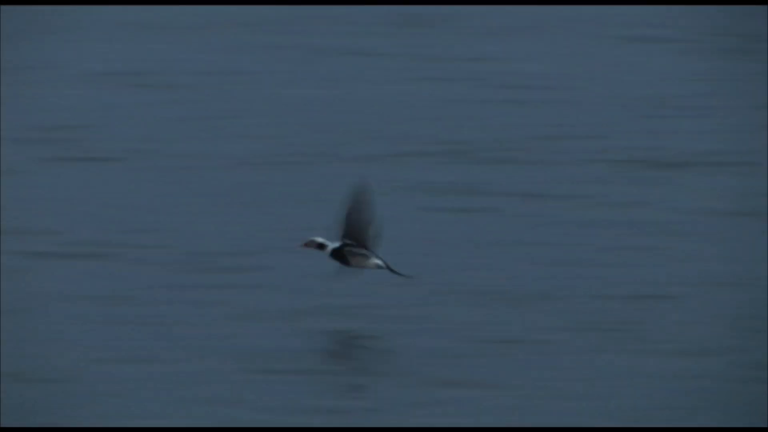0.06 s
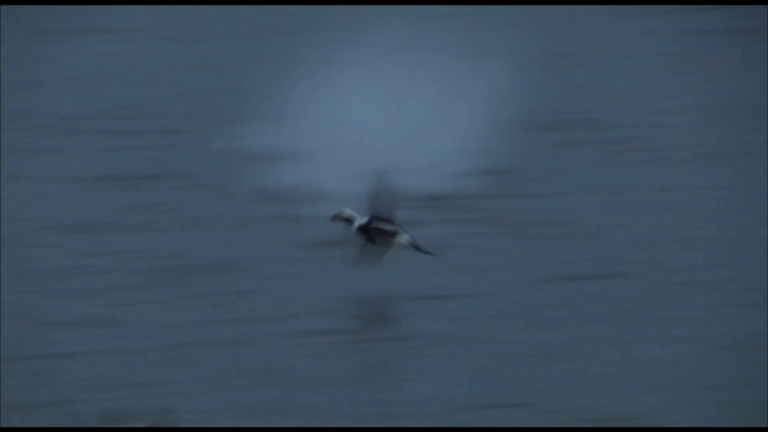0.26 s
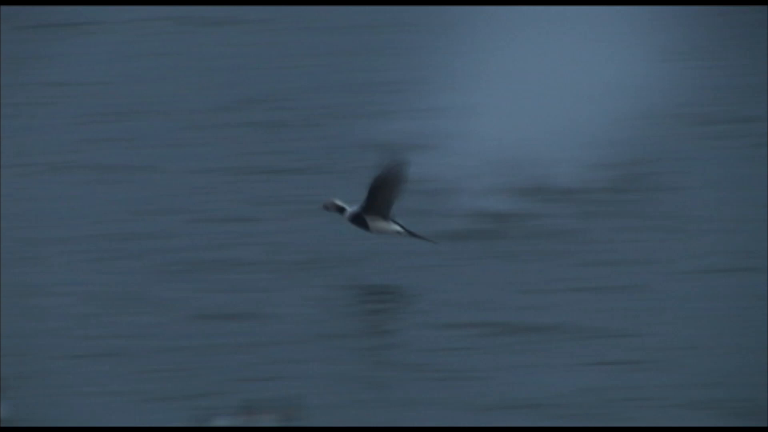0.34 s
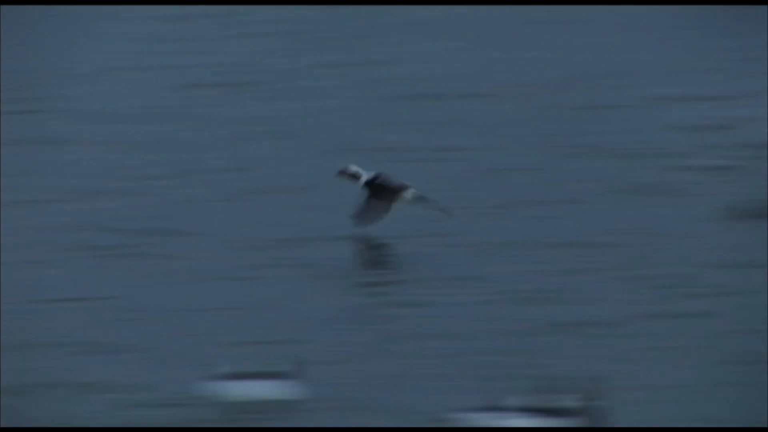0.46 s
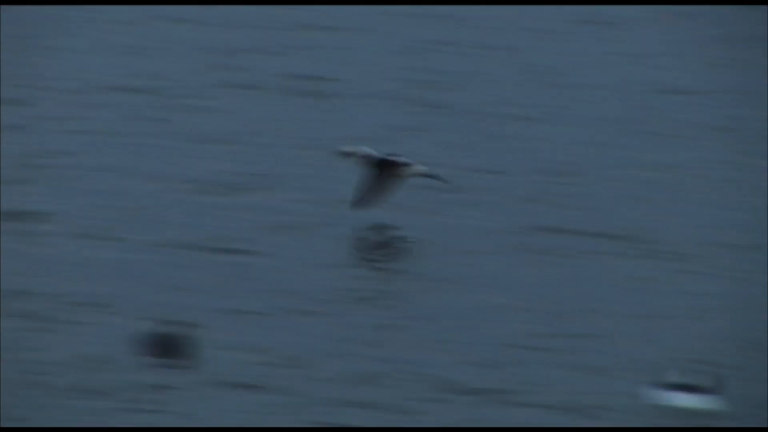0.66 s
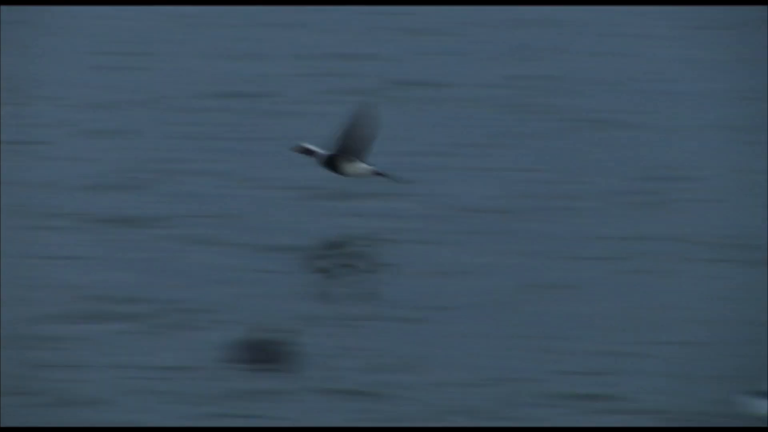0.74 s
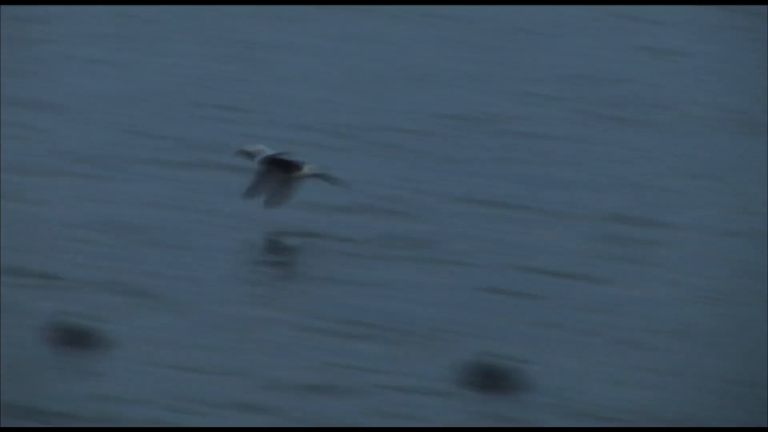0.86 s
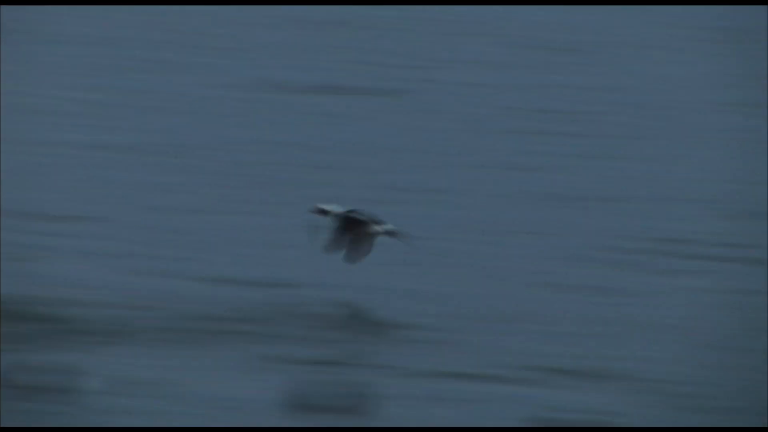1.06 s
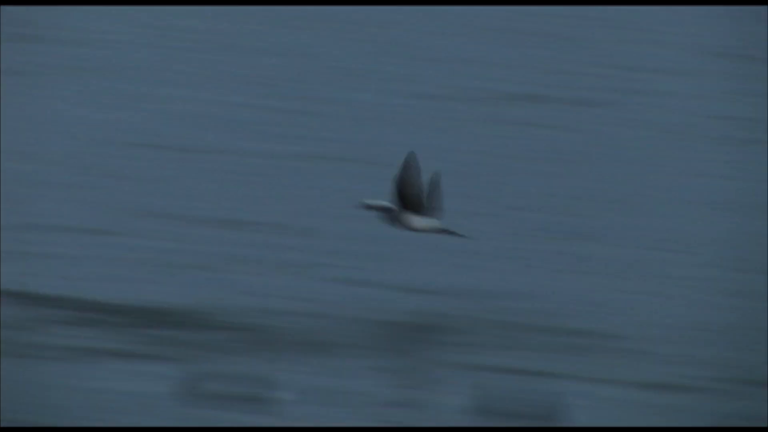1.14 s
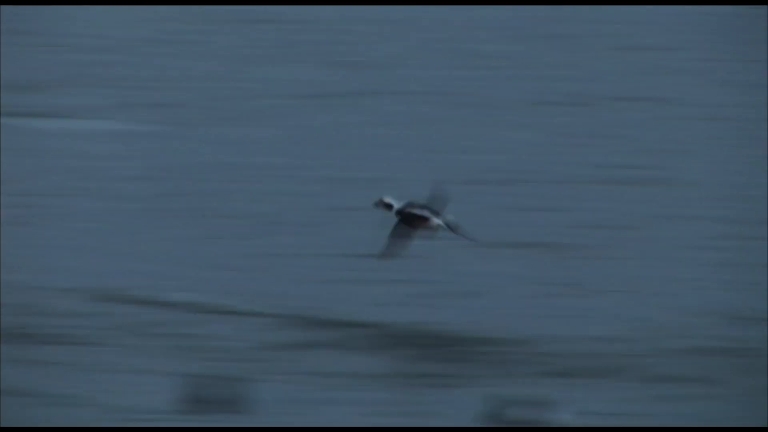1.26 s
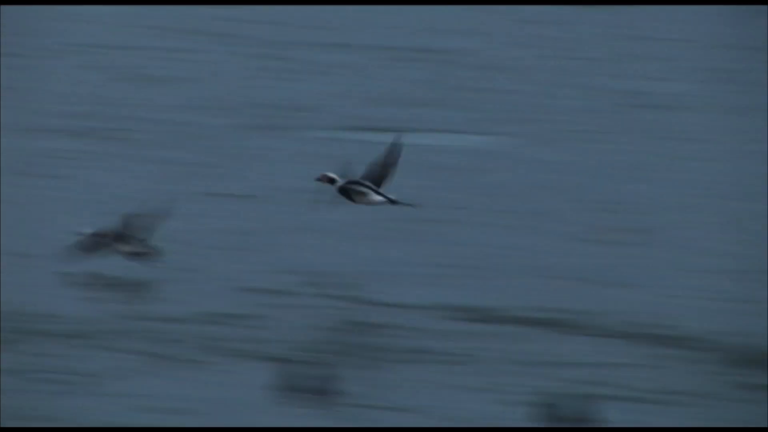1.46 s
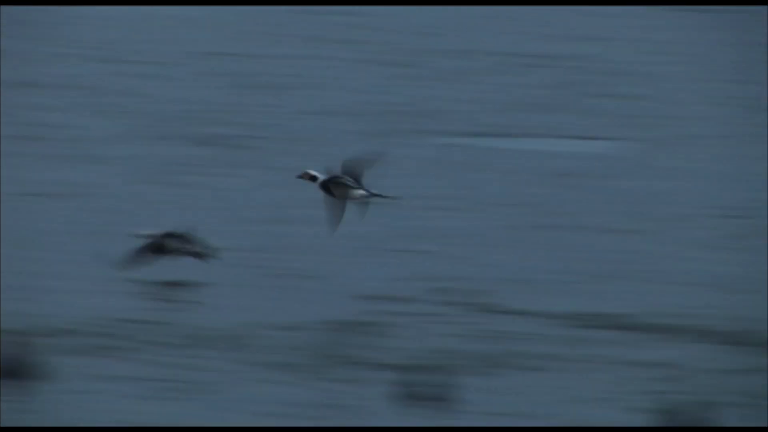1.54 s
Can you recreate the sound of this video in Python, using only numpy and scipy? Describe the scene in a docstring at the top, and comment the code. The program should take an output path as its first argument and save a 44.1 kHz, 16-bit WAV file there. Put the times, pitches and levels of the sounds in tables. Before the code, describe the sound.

A loud, close shotgun blast cracks at 0.2 seconds, overloading the microphone and scattering over open water. Pellets slap the surface at 0.4 seconds. From about 0.7 seconds a rolling echo returns from the far shore and fades. Hollow knocks and metal gun clicks sound nearby between 1 and 1.4 seconds, with a very faint swish and rising whistle. Light wind and quiet lapping water continue throughout.

```python
"""One shotgun shot over open water. After a faint click of the gun, the blast overloads the microphone
and scatters back off the waves. A fifth of a second after the blast, the pellets slap the water.
Then the far shore sends back a rolling echo. As it fades, hollow knocks and metal clicks sound nearby,
followed by a soft swish and a faint, rising whistle. Light wind and lapping water go on throughout."""
import sys
import numpy as np
from scipy import signal
from scipy.fft import rfft, irfft, next_fast_len
from scipy.io import wavfile

SR = 44100
rng = np.random.default_rng(int(sys.argv[2]) if len(sys.argv) > 2 else 0)


def file_out(sig):
    """Save sig as 16-bit WAV at sys.argv[1]."""
    # one column per channel
    cols = np.atleast_2d(sig).T
    # limit, then scale
    lim = np.clip(cols, -1, 1)
    pcm = np.round(lim * 32767).astype(np.int16)
    wavfile.write(sys.argv[1], SR, pcm)


N = 70560
SHOT_S = 0.20265

# Tone of a fine, high hiss: pitch_hz, level_db
FIZZ_TONE = [(1000, -42), (4000, -17.5), (7000, -13.5), (11000, 2), (16000, 1.5)]
# How alike left and right are for near, far and background sounds: pitch_hz, likeness (1 = the same)
NEAR_STEREO = [(100, 0.63), (700, 0.34), (1500, .82), (3100, 1), (5000, 0.4), (7000, .45), (10000, 0.17),
               (15000, 0.33)]
FAR_STEREO = [(100, 1), (600, 0.81), (3000, 0.98), (7000, 0.15), (15000, .15)]
BACKGROUND_STEREO = [(50, 0.24), (1500, 0.83), (9000, .2)]


def muzzle_blast():
    """A thin spit, then a hard crack, a low boom and a fizz; things close by ring and throw it back."""
    # Tones of the crack, the boom and the close echoes: pitch_hz, level_db
    crack_tone = [(30, -19), (150, -11), (230, -20), (345, -5), (500, -8.5), (715, -11), (950, -15),
                  (1250, -8), (1550, -5), (1950, -2), (2300, -9.5), (3000, -4.5), (4300, -15.5),
                  (5000, -11), (6500, -21.5), (11000, -13.5), (16000, -16.5)]
    boom_tone = [(30, -8), (80, -12.5), (140, -3.5), (220, -3), (345, -1.5), (600, -7.5), (1200, -10.5),
                 (3000, -7), (6000, -25), (16000, -49.5)]
    rebound_tone = [(30, -23), (150, -1.5), (360, -4.5), (520, 0.5), (720, -4.5), (1000, -15.5),
                    (8000, -59)]
    # Echoes off things close by: start_s, level_db
    rebound_hits = [(.2288, -10), (.2525, -18.5)]
    # Notes the blast sets ringing near the microphone: pitch_hz, level_db, fade_s
    notes = [(345.8, -3.5, 0.2), (734, -0.5, 0.11), (1215, -13.5, 0.15), (1515, 2, 0.11), (1709, 2, 0.094),
             (2265, -1.5, .12), (2570, -13.5, 0.079), (2937, 1.5, .09), (3840, -9, 0.1)]
    spit = amp(-26) * envelope(SHOT_S - 0.0025, 0.0021, 0.00081, 0.0076) * noise(FIZZ_TONE, NEAR_STEREO)
    crack = amp(-5) * envelope(SHOT_S, 0.0014, 0.0073, 0.071) * noise(crack_tone, NEAR_STEREO, grain_db=1)
    boom = amp(-18) * envelope(SHOT_S, 0.011, 0.023, 0.27) * noise(boom_tone, FAR_STEREO, grain_db=6)
    fizz = amp(-21) * envelope(SHOT_S, 0.001, 0.0052, 0.28) * noise(FIZZ_TONE, NEAR_STEREO, grain_db=10.5)
    ring_middle = ring(notes, SHOT_S, rise_s=0.0037)
    ring_sides = amp(-8) * np.array([[1], [-1]]) * ring(notes[1:], SHOT_S, rise_s=0.0016)
    rebounds = strikes(rebound_hits, rebound_tone, tail_gain=0.03, tail_s=0.0311)
    return spit + crack + boom + fizz + amp(-15) * (ring_middle + ring_sides) + rebounds


def wave_scatter():
    """Countless waves throw the blast back: close ones hiss, distant ones answer later and duller."""
    # Tones of the echo off close and distant waves: pitch_hz, level_db
    near_tone = [(30, -21), (170, -2.5), (300, -10), (700, -5), (1300, -4), (2300, -5.5), (3500, -13),
                 (5000, -27), (7000, -45), (10000, -37), (16000, -39.5)]
    far_tone = [(100, -24), (250, -7), (400, 0.5), (600, -10.5), (1000, -3), (2000, -14.5), (5000, -43)]
    near = amp(-25.5) * envelope(SHOT_S, 0.0067, 0.15, 0.86) * noise(near_tone, FAR_STEREO, grain_db=6.5)
    far = amp(-42.5) * envelope(0.359, 0.11, 0.16, 0.6) * noise(far_tone, FAR_STEREO)
    hiss = amp(-47) * envelope(SHOT_S, 0.02, 0.15, 0.3) * noise(FIZZ_TONE, NEAR_STEREO, grain_db=2)
    return near + far + hiss


def pellets():
    """The cloud of pellets hits the water: a few hard slaps in a dense patter, with fine spray."""
    # Tones of the patter and the hard slaps: pitch_hz, level_db
    patter_tone = [(30, -43), (300, -19.5), (560, -4), (850, -13.5), (1300, -5), (2300, 1.5), (3600, -7.5),
                   (4400, -20.5), (5000, -15), (6000, -28.5), (12500, -30.5), (16000, -39)]
    slap_tone = [(30, -48), (600, -34), (1400, -15.5), (2300, -2), (2750, -2.5), (3200, -6), (3850, -2.5),
                 (4600, -40), (6000, -31), (9000, -50.5), (12500, -33), (16000, -57)]
    # The loudest pellets landing: start_s, level_db
    hits = [(.3912, -11), (.3981, -0.5), (.4003, 1.5), (.4078, 2), (.4202, 0.5), (.4275, -9), (.4333, -28),
            (.4398, -16)]
    peak_s, rise_s, fall_s = 0.4209, 0.012, 0.02
    t = clock() - peak_s
    width_s = np.where(t < 0, rise_s, fall_s)
    cloud = 1 / np.cosh(np.clip(t / width_s, -20, 20))  # a smooth hump in loudness
    patter_stereo = [(3500, 1.0), (8000, 0.86), (12000, 1.0)]  # pitch_hz, likeness
    patter = amp(-13.5) * cloud * noise(patter_tone, patter_stereo, grain_db=5)
    spray = amp(-47) * cloud * noise(FIZZ_TONE, NEAR_STEREO, grain_db=9)
    slaps = strikes(hits, slap_tone, tail_gain=0.025, tail_s=0.0142, bass_delay_s=0.00048)
    return patter + spray + slaps


def shore_echo():
    """The far shore answers with a faint first echo, a broad clap, a lumpy low roll and a crackle."""
    # Tones of the whole shore's echo, its roll and its single faces: pitch_hz, level_db
    shore_tone = [(30, -19), (60, -7), (140, 5), (330, 1.5), (550, -2), (1200, -4.5), (2300, -2.5),
                  (3400, -10.5), (4300, -22.5), (5500, -30.5), (7000, -82), (16000, -48)]
    roll_tone = [(30, -39), (110, 3.5), (175, -5.5), (240, -2), (400, 1), (740, -8.5), (1100, -11),
                 (2300, -12.5), (3500, -28), (5000, -36), (7000, -79.5)]
    face_tone = [(30, -19), (300, -9), (950, 10), (1500, -8), (2100, 3.5), (2900, -5), (4000, -12.5),
                 (6000, -45), (16000, -37.5)]
    # Sharp echoes off single faces of the shore: start_s, level_db
    face_hits = [(.673, -44), (.7295, -13.5), (.759, -18.5), (.847, -20), (.918, -26)]
    first = amp(-34.5) * envelope(0.671, 0.0016, 0.042, 0.54) * noise(shore_tone, FAR_STEREO, grain_db=6.5)
    clap = amp(-23) * envelope(0.709, 0.016, 0.034, 0.25) * noise(shore_tone, FAR_STEREO)
    roll = amp(-33.5) * envelope(0.745, 0.048, 0.077, 0.73) * noise(roll_tone, FAR_STEREO, grain_db=4.5)
    roll *= lumps(depth_db=2, rate_hz=180)
    roll *= envelope(0, 0.028, 0.93, 1.0)  # its end dies away faster
    roll *= amp([[-1.5], [1.5]])  # leans to the right
    crackle = amp(-36.5) * envelope(0.9, 0.016, 0.042, 0.097) * noise(face_tone, FAR_STEREO, grain_db=6.5)
    swells = echo_swells()
    faces = strikes(face_hits, face_tone, tail_gain=0.068, tail_s=0.044)
    return first + clap + roll + swells + crackle + faces


def echo_swells():
    """The rolling echo gathers briefly around one low pitch after another."""
    # Hollow swells in the roll: peak_s, pitch_hz, level_db
    swells = [(.785, 320, -32.5), (0.85, 410, -29.5), (0.911, 180, -32)]
    t, half_length_s = clock(), 0.026
    hum = np.zeros(N)
    for peak_s, hz, db in swells:
        hump = np.exp(-((t - peak_s) / half_length_s) ** 2)
        hum += amp(db) * hump * np.sin(2 * np.pi * (hz * t + rng.random()))
    return hum * lumps(depth_db=1.5, rate_hz=76)


def gun_clicks():
    """Each click rings the gun's metal and rasps briefly."""
    # The clicks: start_s, level_db, rasp_fade_s, ring_db (added to level_db)
    clicks = [(0.086, -43.5, 0.088, -2), (0.59, -41.5, 0.056, -10), (1.0913, -22, 0.012, -5.5),
              (1.1029, -32.5, 0.017, -7), (1.2175, -33, 0.023, -10)]
    # Notes of the metal: pitch_hz, level_db, fade_s
    metal_notes = [(1100, 1, 0.026), (1650, -5.5, 0.014), (3130, -2, 0.018), (3820, 0, 0.0079),
                   (5800, -23.5, 0.042), (9570, -18, 0.0065)]
    # Tone of the rasp: pitch_hz, level_db
    rasp_tone = [(500, -29), (1100, 3), (3400, 4.5), (4400, -3.5), (5600, 1), (7000, -31),
                 (10000, -3), (16000, -11)]
    rasp_noise = noise(rasp_tone, NEAR_STEREO)
    sound = np.zeros((2, N))
    for start_s, db, rasp_fade_s, ring_db in clicks:
        ringing = amp(ring_db) * ring(metal_notes, start_s, rise_s=0.0003)
        rasp = amp(-7) * envelope(start_s, 0.00026, 0, rasp_fade_s) * rasp_noise
        sound += amp(db) * (ringing + rasp)
    return sound


def knocks():
    """Dull knocks on something hollow: a short ring, a tap, and a longer rattle the looser the contact."""
    # The knocks: start_s, level_db, ring_db (more or less ring than usual), looseness (0 to 1)
    hits = [(0.9661, -13.5, -12.5, .06), (0.971, -27.5, -6.5, .07), (1.003, -30, 1.5, 0.13),
            (1.3513, -40.5, -3, .15), (1.3733, -31, -7, 0.13), (1.389, -41, -4, 0.21)]
    # Tone of the tap: pitch_hz, level_db
    tap_tone = [(50, -18), (500, 3.5), (950, 5.5), (2100, 0), (3000, -4.5), (4200, -22), (6000, -43.5),
                (16000, -58)]
    # Notes of the hollow thing: pitch_hz, level_db, fade_s
    hollow_notes = [(185, 2, 0.069), (371.3, 3, 0.039), (940, 1, 0.028), (970, 3, .07), (1530, -16, 0.032)]
    sound = np.zeros(N)
    for start_s, db, ring_db, looseness in hits:
        sound += amp(db + ring_db - 9.5) * ring(hollow_notes, start_s, rise_s=0.00077)
        sound += strikes([(start_s, db)], tap_tone, tail_gain=looseness, tail_s=0.41 * looseness)
    return sound


def whistle():
    """A faint, fuzzy whistle in the distance holds its pitch, then slides upward and blurs."""
    start_s, steady_s = 1.185, 0.06
    pitch_hz, blur_hz, climb_hz_per_s = 2200, 90, 7000
    climb_hz = climb_hz_per_s * np.clip(clock() - start_s - steady_s, 0, 0.2)
    waver, flutter = unit(filtered(rng.standard_normal((2, N)), lambda f: np.exp(-(f / 130) ** 2)))
    hz = pitch_hz + climb_hz + (blur_hz + climb_hz / 2) * waver
    note = (1 + 0.5 * flutter) * np.sin(2 * np.pi * np.cumsum(hz) / SR)
    return amp(-57.5) * envelope(start_s, 0.028, 0.099, 0.15) * unit(note)


def wind():
    """Light gusts rumble on the microphone."""
    # Strength of the wind: time_s, level_db
    gusts = [(0, -46), (.15, -48), (0.601, -47.5), (1.07, -45.5), (1.19, -35.5), (1.27, -42), (1.33, -40),
             (1.39, -49), (1.46, -42), (1.6, -42.5)]
    # Tone of the rumble: pitch_hz, level_db
    wind_tone = [(15, -18), (30, -4), (55, -0.5), (120, -2.5), (200, -8), (350, -20.5), (1000, -43.5),
                 (4000, -109)]
    level_db = np.interp(clock(), *np.transpose(gusts))
    return amp(level_db) * noise(wind_tone, BACKGROUND_STEREO)


def lapping_water():
    """Lapping water makes a quiet, grainy wash."""
    # Tone of the water: pitch_hz, level_db
    water_tone = [(30, -16), (250, 4.5), (600, -0.5), (1400, -2), (2800, -7.5), (4700, -21), (7000, -35.5),
                  (11000, -23.5), (14000, -25), (16000, -35.5)]
    return amp(-51.5) * noise(water_tone, BACKGROUND_STEREO, grain_db=7)


def swish():
    """A soft, brief swish of noise."""
    swish_tone = [(300, 1), (1600, -9), (2350, -1), (3500, -15), (7000, -53)]  # pitch_hz, level_db
    return amp(-53) * envelope(1.123, 0.052, 0.11, 0.27) * noise(swish_tone, BACKGROUND_STEREO)


def envelope(start_s, rise_s, hold_s, fade_s):
    """Loudness over time: a straight rise, a hold, then a fall of 60 dB every fade_s."""
    t = clock() - start_s
    fading_s = np.maximum(t - rise_s - hold_s, 0)
    return np.clip(t / rise_s, 0, 1) * np.exp(-np.log(1000) * fading_s / fade_s)


def noise(tone, stereo, grain_db=0):
    """Stereo noise of average level 1, made of tiny pops; more grain_db makes their sizes more uneven."""
    def middle_and_side(hz):
        angle = np.arccos(np.clip(along(stereo, hz), -1, 1)) / 2
        return amp(along(tone, hz)) * [np.cos(angle), np.sin(angle)]

    pops = rng.standard_normal((2, N)) * amp(grain_db * np.minimum(rng.standard_normal(N), np.e))
    middle, side = filtered(pops, middle_and_side)
    return unit(np.array([middle + side, middle - side]))


def ring(notes, start_s, rise_s):
    """The fading notes of a struck object, each at a slightly random level."""
    return sum(amp(db + rng.standard_normal()) * envelope(start_s, rise_s, 0, fade_s)
               * np.sin(2 * np.pi * (hz * clock() + rng.random())) for hz, db, fade_s in notes)


def strikes(hits, tone, tail_gain, tail_s, bass_delay_s=0):
    """One sharp pulse for each (start_s, level_db) hit, trailed by a short noisy tail."""
    spikes = np.zeros(N)
    for start_s, db in hits:
        spikes += amp(db) * tail_gain * rng.standard_normal(N) * envelope(start_s, 1 / SR, 0, tail_s)
        spikes[round(start_s * SR)] += amp(db)
    delay_bass = lambda hz: np.exp(2j * np.pi * bass_delay_s * 2000 * np.exp(-hz / 2000))
    pulse = filtered(impulse(tone), delay_bass)[:SR // 20]
    return signal.fftconvolve(spikes, pulse / np.abs(pulse).max())[:N]


def impulse(tone, size=2048):
    """A pulse of peak 1 with the given tone."""
    gains = amp(along(tone, np.fft.rfftfreq(size, 1 / SR)))
    cepstrum = irfft(np.log(gains))
    # Folding the second half onto the first packs the energy at the start of the pulse.
    cepstrum[1:size // 2] *= 2
    cepstrum[size // 2 + 1:] = 0
    pulse = irfft(np.exp(rfft(cepstrum)))
    return pulse / np.abs(pulse).max()


def lumps(depth_db, rate_hz):
    """A gain that swells and sinks at random."""
    wobble = filtered(rng.standard_normal(N), lambda hz: np.exp(-(hz / rate_hz) ** 2))
    return amp(depth_db * unit(wobble))


def filtered(x, response):
    """Multiply each pitch in x by response(hz)."""
    size = next_fast_len(N + SR // 2)
    return irfft(rfft(x, size) * response(np.fft.rfftfreq(size, 1 / SR)), size)[..., :N]


def along(points, hz):
    """Read between the rows of a (pitch_hz, value) table, on a log scale of pitch."""
    pitches, values = np.transpose(points)
    return np.interp(np.log(hz + 1), np.log(pitches + 1), values)


def amp(db):
    """Turn decibels into a gain."""
    return 10 ** (np.asarray(db) / 20)


def unit(x):
    """Scale to an average (rms) level of 1."""
    return x / np.sqrt(np.mean(x ** 2) + 1e-20)


def clock():
    """Time of each sample in seconds."""
    return np.arange(N) / SR


def scene():
    """The shot, its echoes and the small sounds around it."""
    shot = muzzle_blast() + wave_scatter() + pellets() + shore_echo()
    return shot + gun_clicks() + knocks() + whistle() + wind() + lapping_water() + swish()


def record(dry):
    """The microphone pair widens the treble; the recorder clips the blast and cuts the highest pitches."""
    # Boost of the difference between left and right: pitch_hz, gain_db
    widening = [(3800, 1), (5000, 9.5), (7000, 14.5), (8500, 9), (9800, -1)]
    top_hz = 15900
    middle = dry.mean(axis=0)
    side = filtered((dry[0] - dry[1]) / 2, lambda hz: amp(along(widening, hz)))
    wide = np.array([middle + side, middle - side])
    clipped = wide / (1 + np.abs(wide) ** 10) ** (1 / 10)
    return filtered(clipped, lambda hz: 1 / np.sqrt(1 + (hz / top_hz) ** 240))


dry = scene()
out = record(dry)
file_out(out)
```